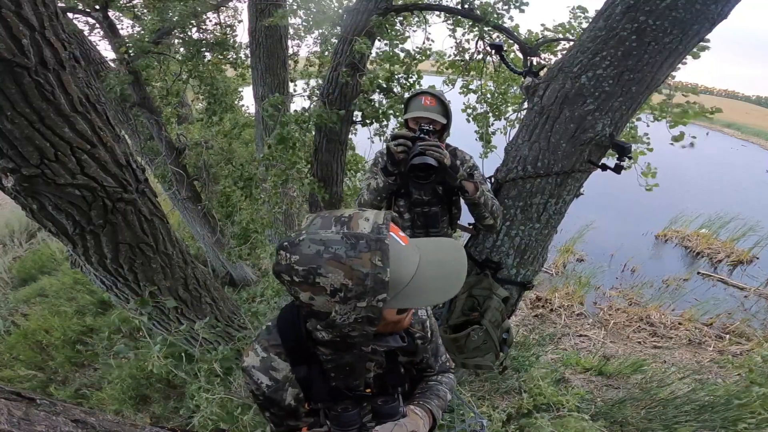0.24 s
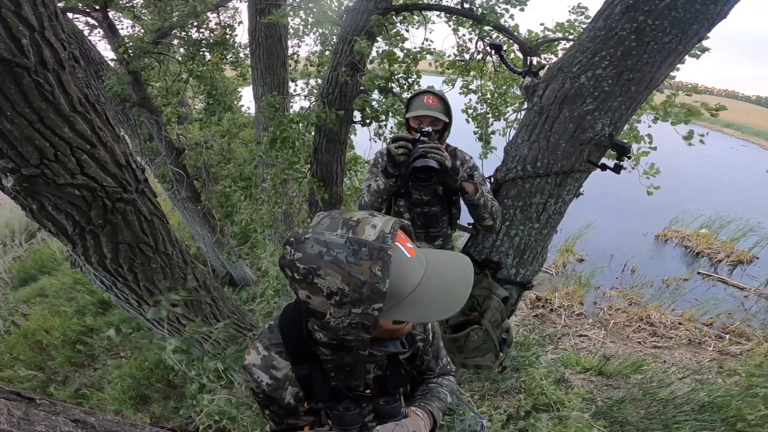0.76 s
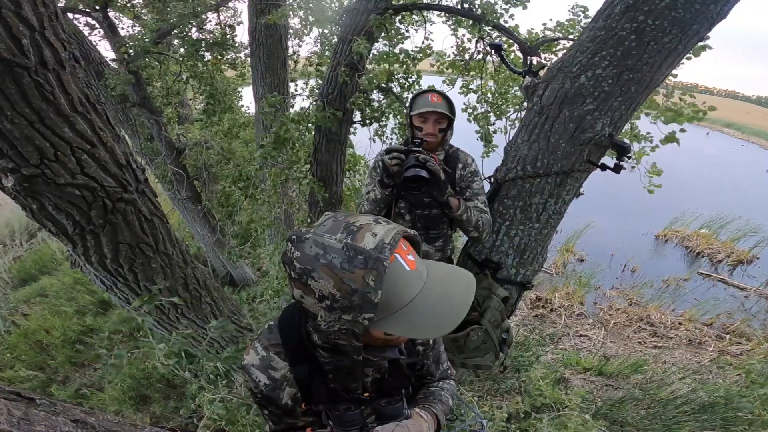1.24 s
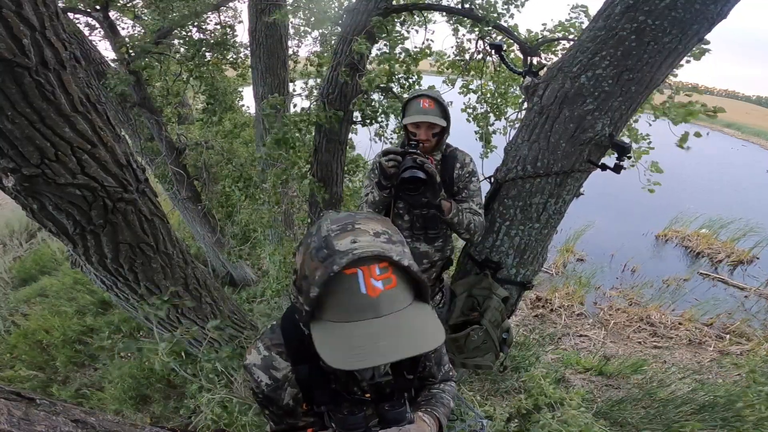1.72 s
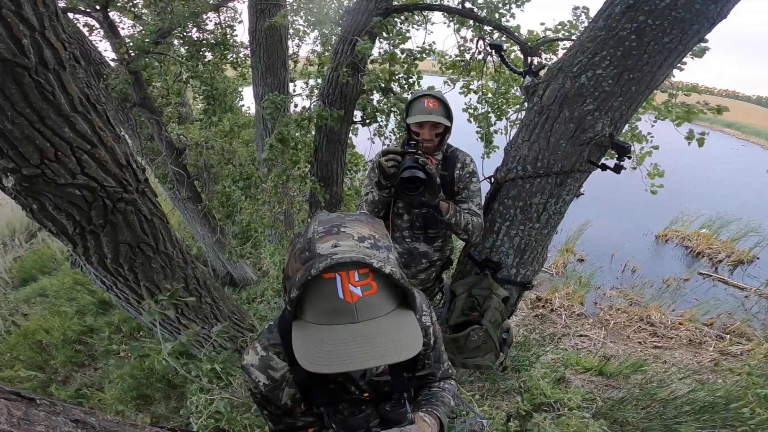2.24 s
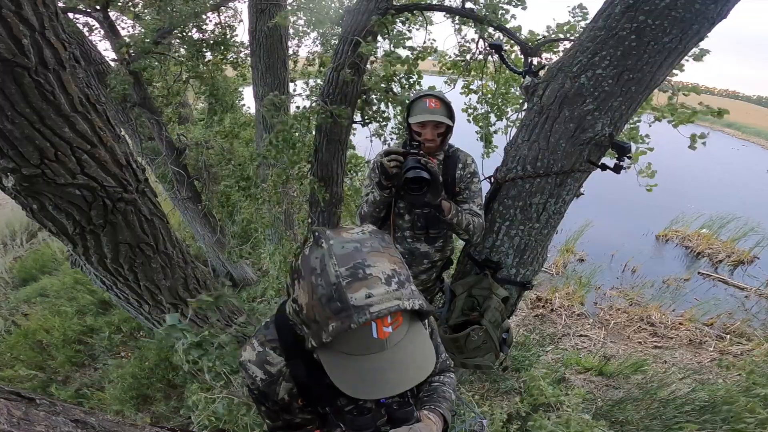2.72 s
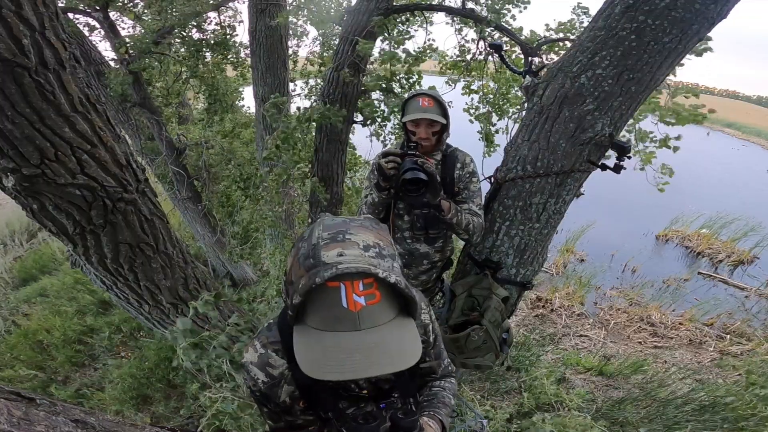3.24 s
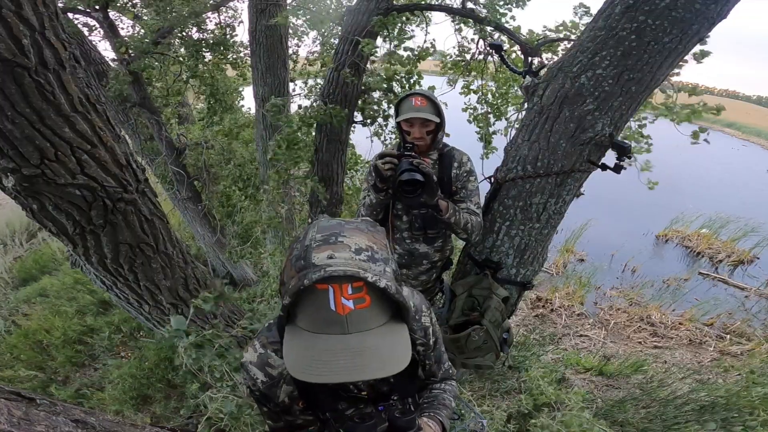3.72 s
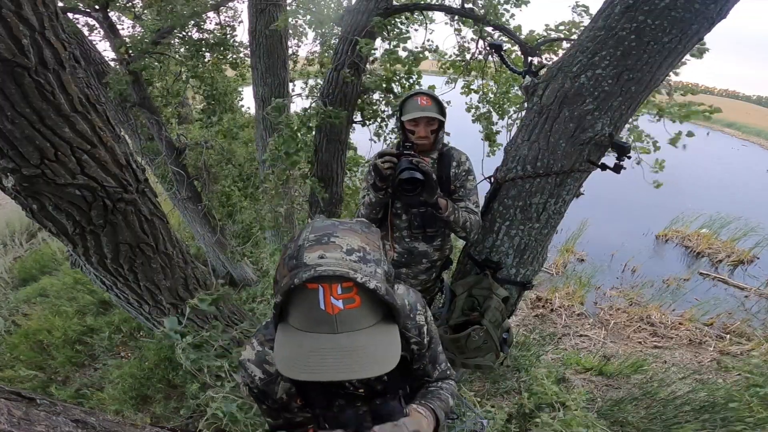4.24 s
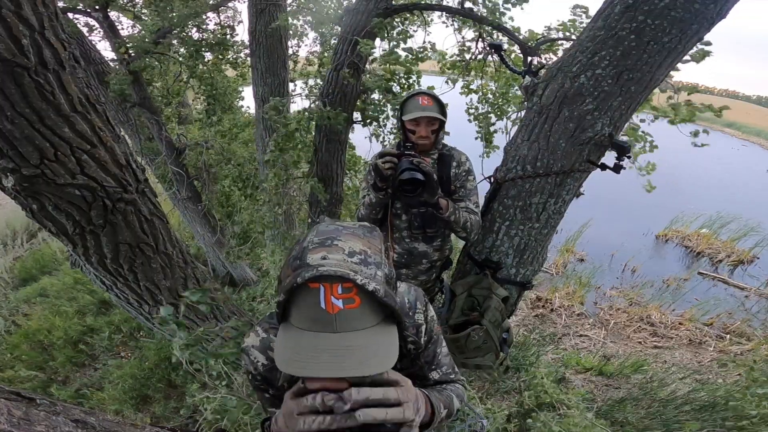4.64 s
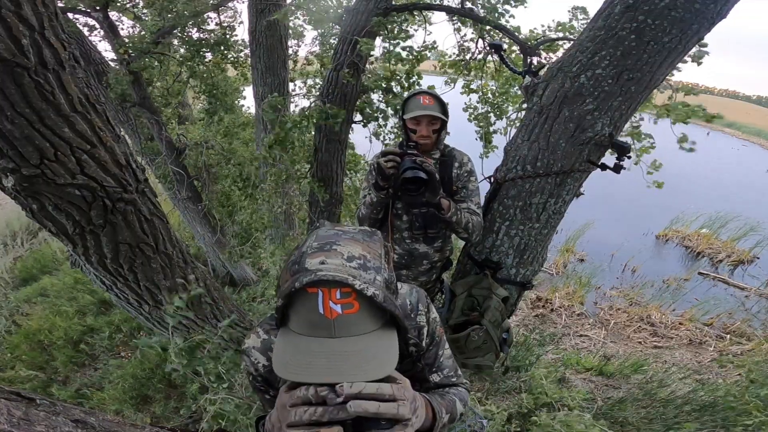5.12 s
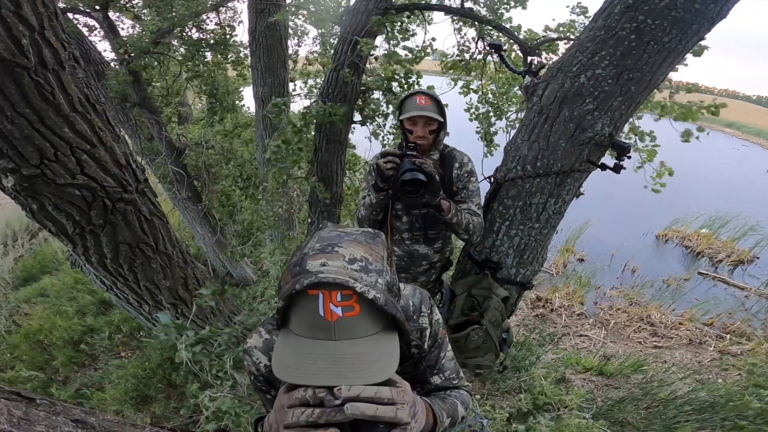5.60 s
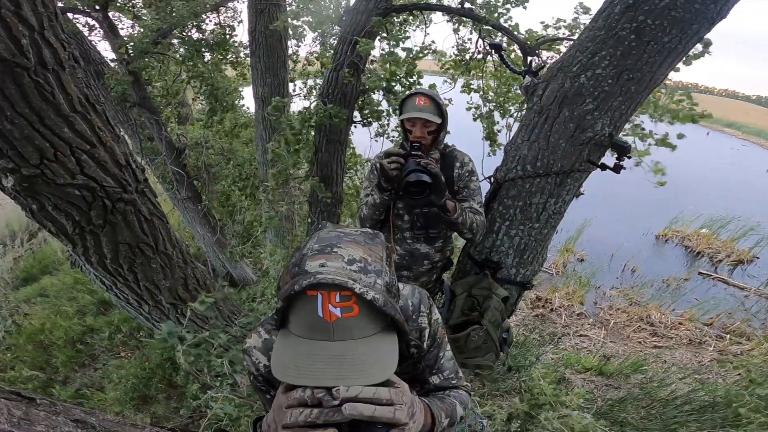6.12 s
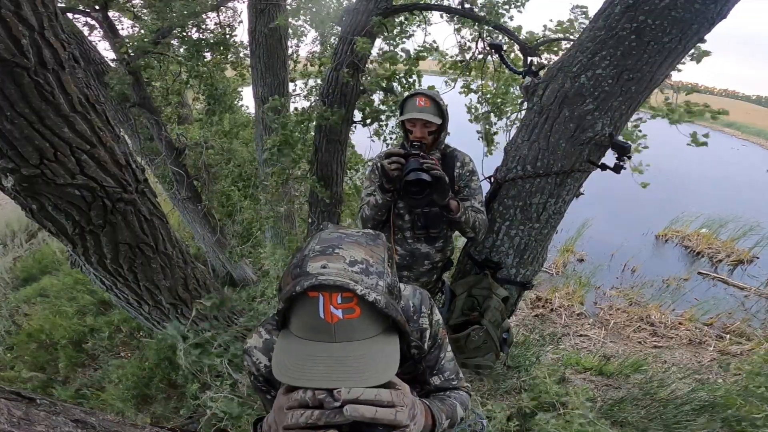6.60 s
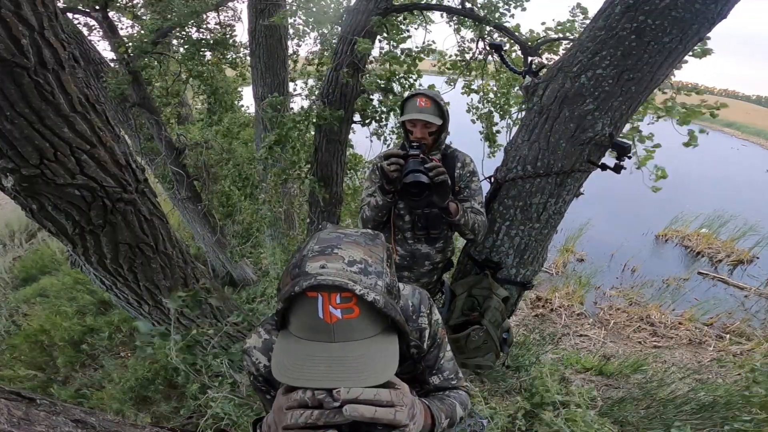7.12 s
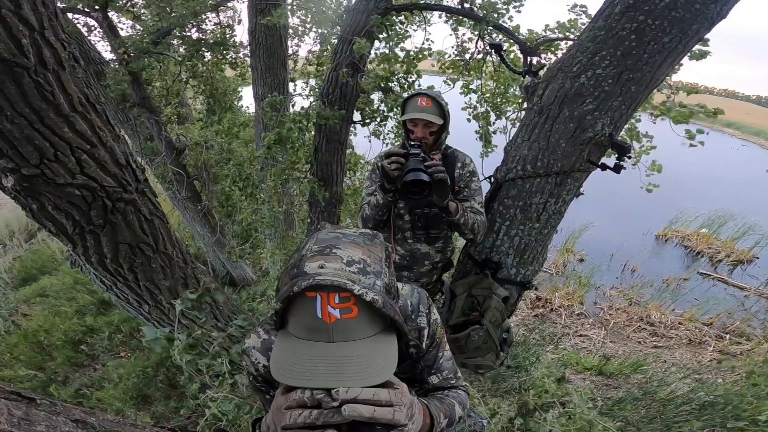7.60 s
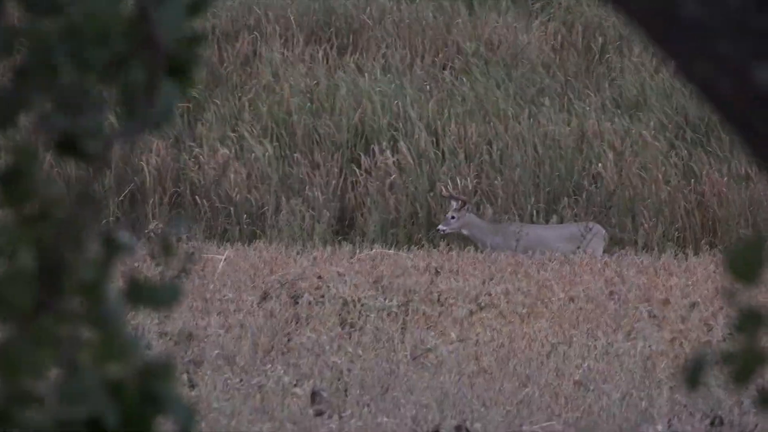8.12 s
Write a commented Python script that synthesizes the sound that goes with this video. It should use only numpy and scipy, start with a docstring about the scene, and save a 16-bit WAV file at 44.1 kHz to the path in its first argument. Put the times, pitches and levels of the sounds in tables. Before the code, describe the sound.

Irregular wind rumble and sudden muffled slaps strike an outdoor microphone while nearby tree foliage rustles faintly and air rushes low through the crowns.

```python
"""Gusty wind buffets a microphone port among the branches of a leafy tree.
Each puff is rumbling noise with its own strength and pitch, over a light, restless draught.
Now and then a tight eddy slaps the port with a single short swing of pressure.
Behind it, leaves merge into a soft hiss of noise and tiny ticks, over the low rush of the crowns."""
import sys
import numpy as np
from scipy import signal
from scipy.fft import rfft, irfft, next_fast_len
from scipy.io import wavfile
from scipy.ndimage import uniform_filter1d

SR = 44100
rng = np.random.default_rng(int(sys.argv[2]) if len(sys.argv) > 2 else 0)


def unload_audio(sound):
    """Save the sound as a 16-bit wav file, at the path given as the first command line argument."""
    columns = np.transpose(np.atleast_2d(sound))
    # keep every value between -1 and 1, then stretch to whole-number steps
    steps = np.round(np.clip(columns, -1, 1) * 32767)
    wavfile.write(sys.argv[1], SR, steps.astype(np.int16))


N = 368235


def from_db(db):
    """Decibels to gain."""
    return 10 ** (np.asarray(db) / 20)


def rms_one(x):
    """Scale to an rms of 1."""
    return x / np.sqrt(np.mean(x ** 2) + 1e-20)


def level_in_time(points):
    """Join (time, level) points with straight lines: the level at every sample."""
    seconds, level_db = np.transpose(points)
    return np.interp(np.arange(N) / SR, seconds, level_db)


def level_at_hz(points, hz):
    """Read a spectrum between its points, on a logarithmic frequency axis."""
    where, level_db = np.transpose(points)
    return np.interp(np.log(hz), np.log(where), level_db)


def drift(rate_hz):
    """Random wandering with an rms of 1: noise smoothed twice, so that little stays above rate_hz."""
    step = 40  # samples between the wandering's own points
    lead_in = 2000  # points dropped while the smoothing settles
    r = np.exp(-2 * np.pi * rate_hz * step / SR)
    noise = rng.standard_normal(N // step + lead_in + 2)
    slow = signal.lfilter([1], [1, -2 * r, r * r], noise)[lead_in:]
    return np.interp(np.arange(N) / step, np.arange(len(slow)), rms_one(slow))


def bands(two_noises, low_hz, high_hz, count):
    """Cut steep bands from two unrelated noises, taken in turn: (centre Hz, band)."""
    edges = np.geomspace(low_hz, high_hz, count + 1)
    for k, pair in enumerate(zip(edges, edges[1:])):
        sos = signal.butter(3, pair, "band", fs=SR, output="sos")
        yield np.sqrt(np.prod(pair)), signal.sosfilt(sos, two_noises[k % 2] + 1e-18)


def swaying(source, spectrum, flutter_db, flutter_hz):
    """Colour a source; each octave swells and sinks a little on its own. Rms 1."""
    size = next_fast_len(N)
    hz = np.maximum(np.arange(size // 2 + 1) * SR / size, 1)
    coloured = rfft(source, size) * from_db(level_at_hz(spectrum, hz))
    octave, out = np.log2(hz), 0
    for k in range(round(np.log2(spectrum[0][0])), 15):
        # neighbouring octaves fade into each other
        share = np.maximum(1 - np.abs(octave - k), 0)
        band = irfft(coloured * share, size)[:N]
        out = out + band * from_db(flutter_db * drift(flutter_hz))
    return rms_one(out)


# puffs of wind that stand out on the port: (centre [s], pressure amplitude [dB], duration [s])
WIND_PUFFS = [(.047, -15, 0.027), (0.094, -21, 0.17), (0.172, -12, 0.011), (0.213, -29.5, 0.038),
              (0.292, -40.5, .04), (0.55, -23.5, .05), (0.84, -28, 0.052), (0.971, -29.5, 0.041),
              (1.209, -28.5, 0.069), (1.301, -28.5, 0.038), (1.432, -21.5, 0.027), (1.512, -27.5, 0.1),
              (1.565, -20.5, 0.034), (1.809, -26, 0.05), (1.883, -29.5, 0.032), (1.928, -19.5, 0.013),
              (1.988, -23.5, 0.057), (2.129, -21, 0.038), (2.197, -22, 0.078), (2.303, -20.5, 0.041),
              (2.371, -24, 0.046), (2.476, -21.5, 0.037), (2.696, -33, 0.1), (3.115, -36, .06),
              (3.428, -29, 0.026), (3.711, -31, 0.048), (3.935, -29, 0.03), (4.005, -20, 0.061),
              (4.077, -24.5, 0.049), (4.186, -36, .08), (4.451, -27, 0.014), (4.622, -23, 0.12),
              (4.803, -14.5, 0.087), (4.902, -32, 0.13), (5.119, -20.5, 0.084), (5.144, -12.5, 0.018),
              (5.324, -13, 0.026), (5.395, -22, 0.052), (5.64, -22.5, 0.075), (5.748, -33, 0.19),
              (5.935, -31.5, 0.093), (6.187, -26, 0.043), (6.376, -12, 0.045), (6.439, -22, 0.039),
              (6.533, -23.5, 0.0094), (6.766, -34.5, 0.069), (6.857, -11.5, 0.016), (6.902, -21, 0.057),
              (6.943, -24, .02), (7.125, -32.5, 0.085), (7.575, -29.5, 0.077), (8.129, -23.5, .065),
              (8.212, -28, 0.031), (8.313, -31.5, 0.018)]
# light draught between the puffs, before its random swings: (time [s], pressure amplitude [dB])
LIGHT_DRAUGHT = [(0, -32), (.7, -55.5), (1.05, -39), (1.7, -45.5), (2.3, -38), (3.3, -51), (3.95, -45.5),
                 (4.3, -45.5), (4.6, -38), (5.28, -38.5), (5.6, -31), (6.6, -48), (6.95, -41.5), (7.3, -48),
                 (7.8, -54.5), (8.0, -37.5), (8.35, -47)]
PUFF_EDGE = 4.6  # how abruptly a puff starts and stops: 2 is a bell, more is squarer
# the draught comes in small random puffs around a rumble of its own
DRAUGHT_SWING_DB, DRAUGHT_SWING_HZ, DRAUGHT_RUMBLE_HZ = 10, 18, 92
# a typical puff, from which the pitch of the others is reckoned
TYPICAL_DB, TYPICAL_S, TYPICAL_RUMBLE_HZ = -25, .05, 130.9
# stronger and longer puffs carry faster air and sound higher
OCTAVES_PER_DB, OCTAVES_PER_DOUBLED_LENGTH = 0.0217, 0.12


def port_pressure():
    """Draught and puffs add up in power: (pressure amplitude, power-weighted centre of the rumble Hz)."""
    t = np.arange(N) / SR
    restless_db = DRAUGHT_SWING_DB * np.tanh(drift(DRAUGHT_SWING_HZ))
    power = from_db(level_in_time(LIGHT_DRAUGHT) + restless_db) ** 2
    weighted_hz = power * DRAUGHT_RUMBLE_HZ
    for centre, db, duration in WIND_PUFFS:
        near = slice(*np.searchsorted(t, [centre - 2 * duration, centre + 2 * duration]))
        shape = np.exp(-np.abs(2 * (t[near] - centre) / duration) ** PUFF_EDGE)
        puff_power = from_db(db) ** 2 * shape
        octaves = OCTAVES_PER_DB * (db - TYPICAL_DB)
        octaves += OCTAVES_PER_DOUBLED_LENGTH * np.log2(duration / TYPICAL_S)
        power[near] += puff_power
        weighted_hz[near] += puff_power * TYPICAL_RUMBLE_HZ * 2 ** octaves
    return np.sqrt(power), weighted_hz / power


# how the turbulent rumble spreads around its centre: (multiple of centre frequency [1], level [dB per Hz])
RUMBLE_SPECTRUM = [(.12, -14), (.3, -14.5), (.6, 1), (1, -0.5), (1.6, -7), (2.5, -20.5), (4, -35),
                   (6, -44.5), (10, -74)]


def buffeting(eddy_s, lump_db, lump_hz, speed_db):
    """Turbulent pressure on the port: each puff sets its strength, and faster air moves the rumble up."""
    pressure, puff_hz = port_pressure()
    # the air comes in quick lumps; the faster ones are both louder and brighter
    wander = drift(lump_hz)
    quick = wander - uniform_filter1d(wander, size=SR // 25)
    lumps = np.tanh(rms_one(quick))
    centre_hz = puff_hz * from_db(speed_db * lumps)
    # the first second lets the band filters settle
    split = bands(rng.standard_normal((2, N + SR)), 20, 1500, count=15)
    rumble = sum(band[SR:] * from_db(level_at_hz(RUMBLE_SPECTRUM, hz / centre_hz))
                 for hz, band in split)
    # even out the rumble's energy over the life of an eddy, so the puff and its lumps set the strength
    window = np.exp(-(np.arange(-SR // 10, SR // 10 + 1) / (eddy_s * SR)) ** 2)
    local_power = signal.fftconvolve(rumble ** 2, window / window.sum(), "same")
    even_rumble = rumble / np.sqrt(2 * local_power + 1e-20)
    return even_rumble * pressure * rms_one(from_db(lump_db * lumps))


# tight eddies that hit the port squarely, before the port softens them:
# (time [s], peak of the swing's envelope [dB], strongest frequency [Hz])
EDDY_SLAPS = [(.027, -11.5, 150), (0.038, -8.5, 130), (.051, -7, 254), (.078, -14, 200), (.125, -13.5, 194),
              (1.423, -14.5, 193), (1.924, -14.5, 123), (2.216, -14, 148), (4.022, -14, 190),
              (4.081, -17.5, 114), (4.807, -8.5, 229), (4.812, -16, 217), (5.138, -12, 138),
              (5.312, -21, 153), (5.328, -10.5, 215), (6.364, -3.5, 151), (6.379, -12, 100),
              (6.861, 1, 117), (6.906, -7.5, 109)]


def slaps():
    """A vortex crossing the port gives one swing of pressure, the shorter the tighter it is."""
    t, out = np.arange(N) / SR, np.zeros(N)
    # a random angle sets how the swing divides into push and pull
    angles = rng.uniform(0, 2 * np.pi, len(EDDY_SLAPS))
    for (centre, db, hz), angle in zip(EDDY_SLAPS, angles):
        near = slice(*np.searchsorted(t, [centre - 10 / hz, centre + 10 / hz]))
        swing = np.exp(1j * angle) / (1 - 1j * np.pi * hz * (t[near] - centre)) ** 3
        out[near] += from_db(db) * swing.real
    return out


PORT_LIMIT, PORT_DULL_HZ = .85, 1200  # largest pressure; treble fades above this frequency


def port(pressure):
    """The port rounds the hardest blows and passes only their dull part."""
    rounded = PORT_LIMIT * np.tanh(pressure / PORT_LIMIT)
    return signal.sosfilt(signal.butter(2, PORT_DULL_HZ, fs=SR, output="sos"), rounded)


# wind in the tree, the base level that leaves and crowns follow: (time [s], level [dB])
TREE_WIND = [(0, -53.5), (1.2, -53), (3.3, -53), (3.62, -52), (5.0, -52.5), (5.4, -52.5), (6.1, -53),
             (6.55, -54), (6.8, -53.6), (7.0, -55), (8.0, -53.5), (8.35, -54)]


def tree_wind():
    """The strength of the wind in the tree, in dB at every sample."""
    return level_in_time(TREE_WIND)


# colour of the leaves, only the shape matters: (frequency [Hz], level [dB per Hz])
LEAF_COLOUR = [(900, -6), (1800, -7), (2300, -3), (3100, 0.5), (4200, -1), (5500, -5), (7000, -9),
               (9000, -16), (11000, -22)]
LEAF_HISS_DB, LEAF_TICK_DB = 0.39, -11  # far hiss and near ticks, against the wind level


def leaves(wind_db, touches_per_s, size_spread_db):
    """Far leaves merge into a hiss; near ones tick against each other, more often as the wind rises."""
    touch_rate = touches_per_s * from_db(2 * (wind_db - wind_db.mean()))
    touching = rng.random(N) < touch_rate / SR
    sizes = from_db(size_spread_db * np.minimum(rng.exponential(1, N), 4)) * rng.choice([-1, 1], N)
    near = swaying(touching * sizes, LEAF_COLOUR, flutter_db=-2.5, flutter_hz=12)
    far = swaying(rng.standard_normal(N), LEAF_COLOUR, flutter_db=0.78, flutter_hz=21)
    # a twig shakes all its near leaves together
    shake_db = 0.9 * drift(11)
    return from_db(wind_db) * (from_db(LEAF_HISS_DB) * far + from_db(LEAF_TICK_DB + shake_db) * near)


# colour of the rush, only the shape matters: (frequency [Hz], level [dB per Hz])
RUSH_COLOUR = [(30, -24), (70, 11.5), (180, 2.5), (280, 1.5), (430, 2), (600, -1), (900, -7), (1300, -10.5),
               (1900, -17.5), (3500, -30), (8000, -56)]
RUSH_GAIN_DB, RUSH_FOLLOWS = 7, 0.97  # rush against the wind level; dB it swells per dB of wind level


def crowns(wind_db):
    """The broad low rush of air through branches and reeds all around; it swells with the leaves."""
    rush_db = wind_db.mean() + RUSH_FOLLOWS * (wind_db - wind_db.mean()) + RUSH_GAIN_DB
    return from_db(rush_db) * swaying(rng.standard_normal(N), RUSH_COLOUR, flutter_db=0.9, flutter_hz=5.6)


def scene():
    """The wind on the microphone itself, and the tree all around."""
    wind = buffeting(eddy_s=0.018, lump_db=3.5, lump_hz=23.7, speed_db=0.44) + slaps()
    wind_db = tree_wind()
    tree = leaves(wind_db, touches_per_s=900, size_spread_db=3.9) + crowns(wind_db)
    return (port(wind) + tree)[None]


LOW_CUT_HZ, CUTOFF_HZ = 30, 11000


def record(dry):
    """The deepest rumble is rolled off and the top is cut steeply."""
    thinned = signal.sosfilt(signal.butter(2, LOW_CUT_HZ, "high", fs=SR, output="sos"), dry)
    return signal.sosfilt(signal.ellip(12, .1, 80, CUTOFF_HZ, fs=SR, output="sos"), thinned)


dry = scene()
out = record(dry)
unload_audio(out)
```